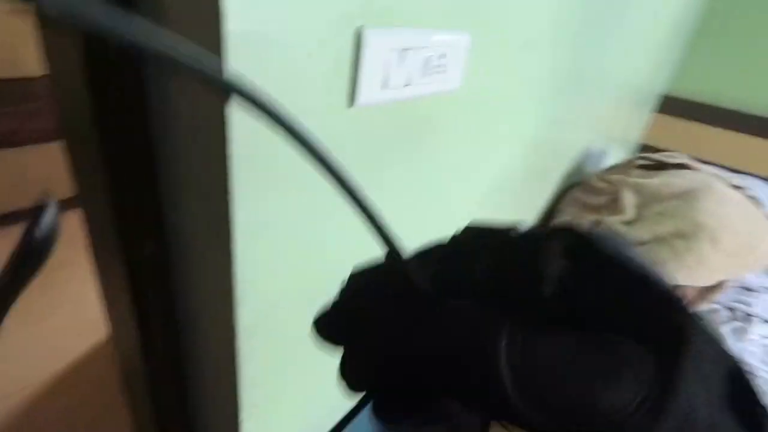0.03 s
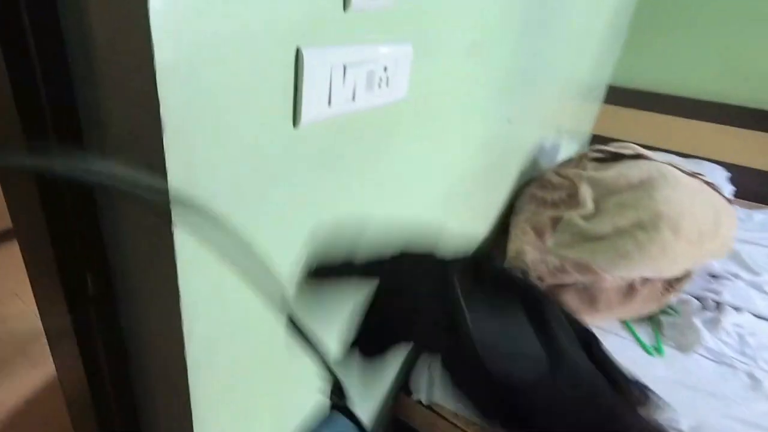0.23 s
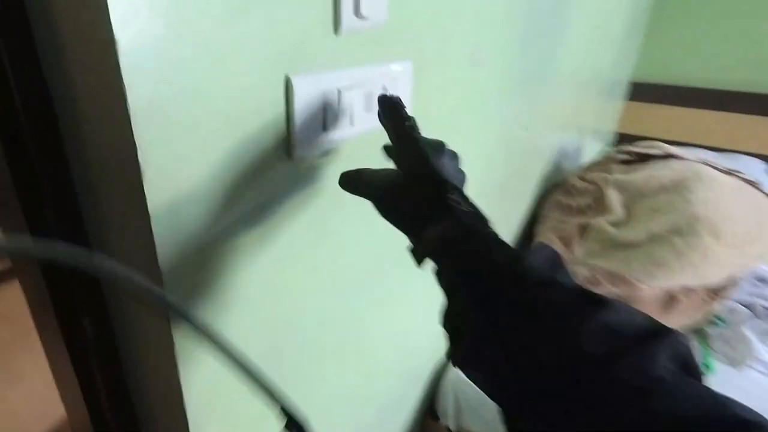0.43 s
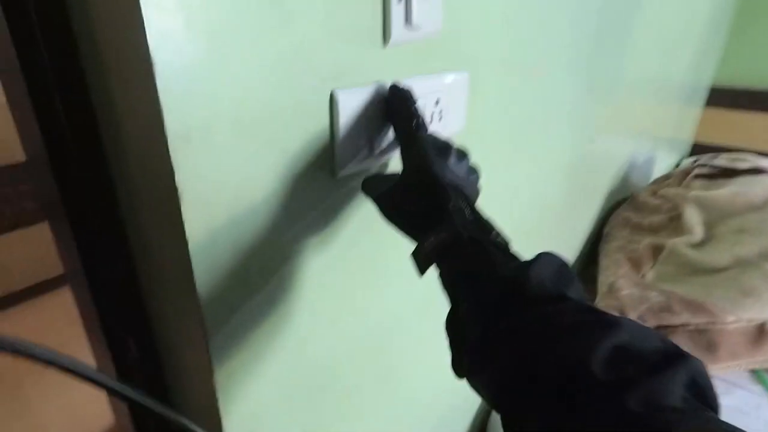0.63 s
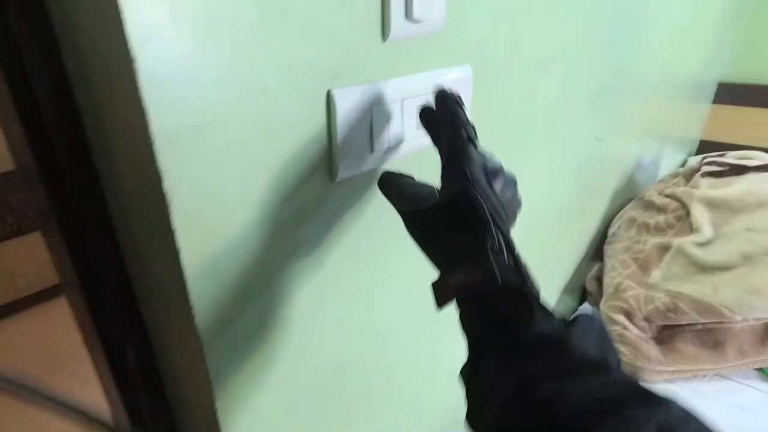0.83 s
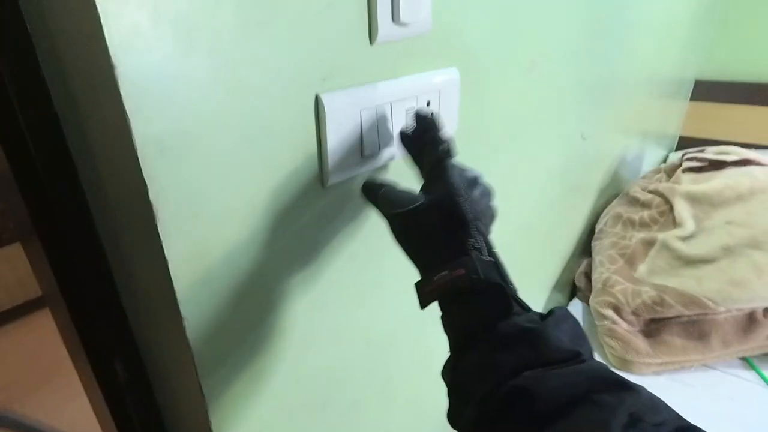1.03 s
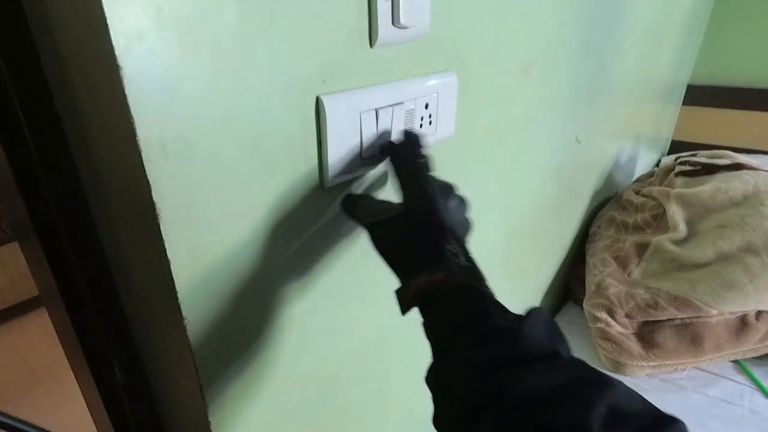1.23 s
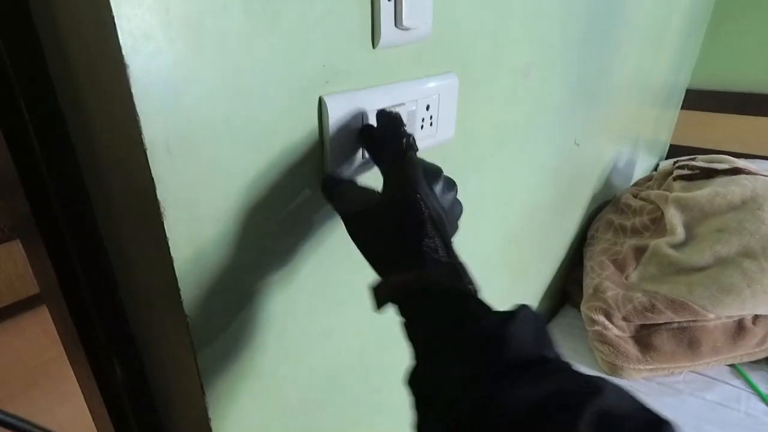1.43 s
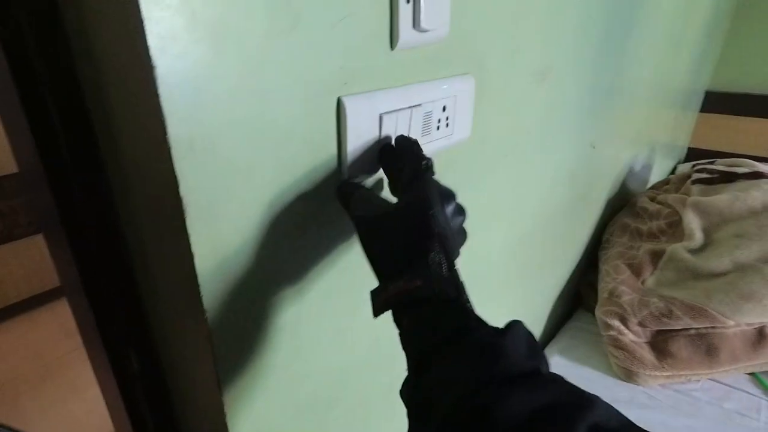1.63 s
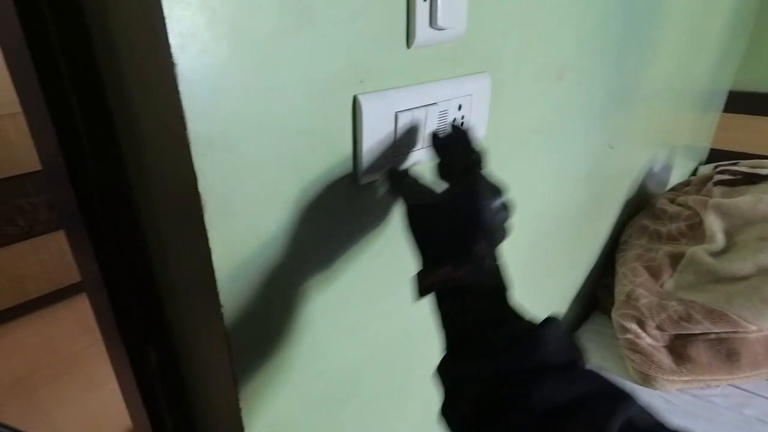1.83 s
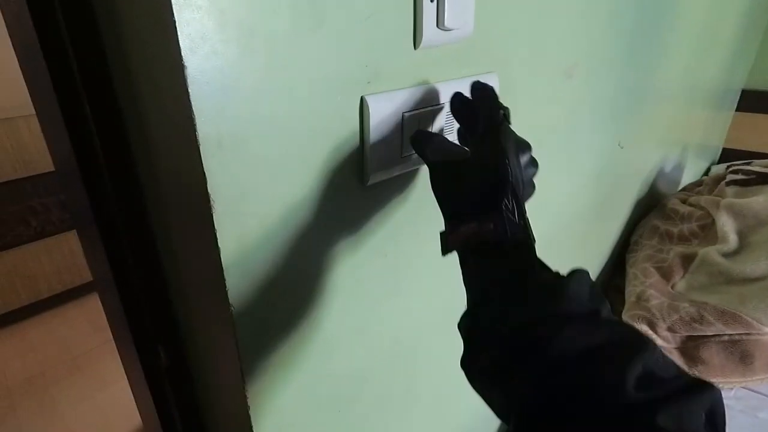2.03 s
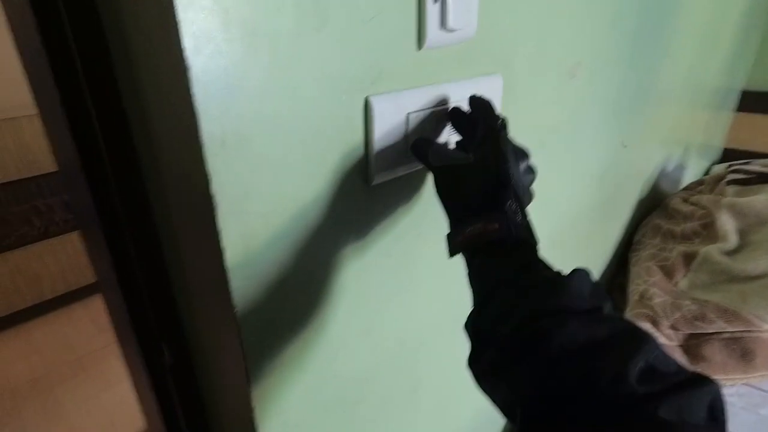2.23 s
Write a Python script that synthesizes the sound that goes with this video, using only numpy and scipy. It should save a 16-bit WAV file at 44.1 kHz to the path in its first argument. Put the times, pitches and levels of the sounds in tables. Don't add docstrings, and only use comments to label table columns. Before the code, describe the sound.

Three sharp plastic wall-switch clicks, spaced half a second apart, in a quiet furnished room

```python
import sys
import numpy as np
from scipy import signal
from scipy.fft import rfft, irfft
from scipy.io import wavfile
from scipy.ndimage import uniform_filter1d

SR = 44100
rng = np.random.default_rng(int(sys.argv[2]) if len(sys.argv) > 2 else 0)


def field_ratio(decibels):
    return 10 ** (np.asarray(decibels, dtype=float) / 20)


def pcm_store(signal):
    levels = np.round(np.clip(np.atleast_2d(signal), -1, 1) * 32767)
    wavfile.write(sys.argv[1], SR, levels.astype(np.int16).T)


N = 100459
LAG_S = 3 / 44100

# hz, left_minus_right_db
PORT_LEAN = [(100, 0.86), (1650, -0.9), (5000, -0.8), (15000, 1.2)]


def evened(x):
    return x / np.sqrt(np.mean(x ** 2) + 1e-20)


def read(points, hz):
    f, value = np.transpose(points)
    return np.interp(np.log(hz + 1), np.log(f + 1), value)


def over_time(points):
    return np.interp(np.arange(N) / SR, *np.transpose(points))


def add(mix, s, sound):
    part = mix[round(s * SR):][:len(sound)]
    part += sound[:len(part)]


def shaped(x, spectrum):
    hz = np.fft.rfftfreq(len(x), 1 / SR)
    return irfft(rfft(x) * field_ratio(read(spectrum, hz)), len(x))


def coloured(x, spectrum):
    return evened(shaped(x, spectrum))


def resonate(x, hz, width):
    r = np.exp(-np.pi * width / SR)
    poles = [2, -4 * r * np.cos(2 * np.pi * hz / SR), 2 * r * r]
    return signal.lfilter([1 - r * r, 0, r * r - 1], poles, x)


def ring(modes, rise_s, scatter_db):
    t = np.arange(8000) / SR
    luck = rng.standard_normal((len(modes), 2))
    out = np.zeros(len(t))
    for (hz, db, t60), (level, phase) in zip(modes, luck):
        decay = field_ratio(db + scatter_db * level - 60 * t / t60)
        out += decay * np.sin(2 * np.pi * hz * t + phase / 3)
    return (1 - np.exp(-t / rise_s)) * out


def ports(x, balance):
    hz = np.fft.rfftfreq(N, 1 / SR)
    half = field_ratio(read(balance, hz) / 2) * np.exp(-1j * np.pi * hz * LAG_S)
    return irfft(rfft(x) * np.array([half, 1 / half]), N)


def switches():
    # start_s, peak_db
    strikes_a = [
        (.7191, -33.5),
        (.7203, -31.5),
        (.7215, -43),
        (.7227, -37),
        (.7245, -36.5),
    ]
    strikes_b = [
        (1.2441, -31.5),
        (1.2450, -33.5),
        (1.2463, -36.5),
        (1.2475, -30),
        (1.2493, -29),
        (1.2510, -35),
        (1.2530, -37),
    ]
    strikes_c = [
        (1.7801, -29.5),
        (1.7814, -31),
        (1.7834, -36),
        (1.7853, -37.5),
        (1.7880, -44),
    ]
    # pitch_hz, level_db, t60_s
    rocker_a = [(870, -32, 0.029), (1118, 3, 0.032), (1480, -3, .012), (2070, -2, 0.0071), (2705, 4, 0.011),
                (2950, 2, 0.015), (3240, -7.5, 0.013), (3540, -26, .01), (4760, -4, 0.027),
                (6350, -20, .01), (14800, -24, 0.0072)]
    rocker_b = [(1195, -27, 0.089), (1480, -16, 0.008), (1970, -17, 0.0074), (2347, -7, 0.016),
                (2800, 4, 0.02), (2840, -17, 0.016), (2980, -1, 0.016), (3680, -4, 0.016),
                (4800, -6, 0.013), (5080, -8, 0.023), (4290, -12, 0.01), (7600, -16, 0.0088),
                (14300, -14, 0.0092)]
    rocker_c = [(819, -13, 0.19), (1240, -3.5, 0.034), (1690, -7.5, 0.05), (2050, -1, 0.016),
                (2550, -1, 0.013), (3150, 6.5, 0.012), (3540, -11, 0.022), (5110, -6.5, 0.016),
                (7600, -17, 0.009), (11370, -21, 0.0092), (15100, -16, 0.0065)]
    # hz, db_per_hz
    crack_colour = [(600, -10), (1000, -10), (2200, 0), (3500, 1.5), (5100, -13.5), (5800, -17),
                    (14500, -22.5), (16300, -39)]
    rise_s, scatter_db = .0002, 1.5
    crack_db, crack_t60_s = 0.5, .012

    cracks, rings = np.zeros(N), np.zeros(N)
    t = np.arange(2000) / SR
    for strikes, modes in ((strikes_a, rocker_a), (strikes_b, rocker_b), (strikes_c, rocker_c)):
        for s, db in strikes:
            add(rings, s, field_ratio(db) * ring(modes, rise_s, scatter_db))
            splinter = coloured(rng.standard_normal(len(t)), crack_colour)
            decay = field_ratio(db + crack_db - 60 * t / crack_t60_s)
            add(cracks, s, decay * np.minimum(t / rise_s, 1) * splinter)
    return cracks, rings


def thrown():
    # start_s, level_db
    snaps = [
        (.721, -14.5),
        (1.248, -10),
        (1.782, -11.5),
    ]
    # hz, level_db
    colour = [(600, -12), (900, 1.5), (1700, -3), (2400, 1.5), (3800, 1.5), (4400, -12), (5300, -2),
              (6400, -28)]
    puffs = np.zeros(N)
    for s, db in snaps:
        puffs[round(s * SR)] = field_ratio(db)
    return shaped(puffs, colour)


def room(x):
    # hz, t60_s
    decay = [(700, 0.58), (1500, 0.44), (3000, 0.32), (6000, 0.32), (12000, 0.053)]
    start_s = .007
    taps = np.zeros((2, 22000))
    at = np.arange(0, 21980, 20) + rng.integers(0, 20, (2, 1099))
    np.put_along_axis(taps, at, rng.choice([-1., 1.], at.shape), 1)
    taps[1] = .8 * np.roll(taps[0], -3) + .6 * taps[1]
    hz, t, z = signal.stft(taps, SR, nperseg=256)
    tail = signal.istft(z * field_ratio(-60 * t / read(decay, hz)[:, None]), SR, nperseg=256)[1]
    tail = np.pad(tail, ((0, 0), (round(start_s * SR), 0)))
    return signal.fftconvolve(x[None], tail / np.linalg.norm(tail[0]), axes=1)[:, :N]


def mount():
    # time_s, effort_db
    motion = [(0.0, -42), (0.23, -54), (0.34, -51), (0.38, -43), (0.46, -51), (0.63, -40), (0.66, -47),
              (0.68, -42), (0.82, -52), (0.85, -47.5), (1.18, -47.5), (1.27, -52.5), (1.32, -49.5),
              (1.37, -60), (1.57, -68), (1.63, -45.5), (1.75, -59), (2.28, -69)]
    # pitch_hz, width_hz, level_db, share_of_effort
    resonances = [(49, 34, -17.5, 0.33), (117.1, 27.4, -9, 1.19), (227, 46.5, -1.5, 1.16),
                  (316, 38, -9, 1.3), (437.7, 72, -10.5, 1.13), (856, 36, -12, 0.33),
                  (1079, 114, -15, 0.37)]
    # start_s, low_db, high_db
    knocks = [
        (0.372, -38, -67),
        (.508, -50, -38),
        (0.597, -24.5, -47),
        (.621, -29, -36.5),
        (.677, -29.5, -78),
        (1.115, -33, -74),
        (1.125, -59, -34.5),
        (1.622, -33.5, -54),
        (1.635, -31.5, -37),
        (1.702, -39, -48.5),
    ]
    # pitch_hz, level_db, t60_s
    knock_low = [(130, 0.5, 0.027), (235.7, -6.5, .09), (305, -8.5, 0.04), (456, -6, 0.025)]
    knock_high = [(640, -6.5, 0.035), (872, 1.5, 0.059), (1102, -5, 0.04), (1384, -8, 0.034)]
    # pitch_hz, level_db, t60_s
    thump = [(49, -44, .45)]
    slips_per_s, slip_spread_db, rest_db = 900, 3, -46.5

    effort_db = over_time(motion) - rest_db
    out = np.zeros(N)
    for hz, width, db, share in resonances:
        size = field_ratio(slip_spread_db * np.minimum(rng.exponential(1, N), 4))
        sign = rng.choice([-1., 1.], N)
        slips = size * sign * (rng.random(N) < slips_per_s / SR)
        shake = resonate(resonate(slips, hz, 1.46 * width), hz, 1.46 * width)
        out += field_ratio(rest_db + db + share * effort_db) * evened(shake)
    for s, low_db, high_db in knocks:
        dull = field_ratio(low_db) * ring(knock_low, .005, 1.5)
        bright = field_ratio(high_db) * ring(knock_high, .002, 1.5)
        add(out, s, dull + bright)
    add(out, .365, ring(thump, 0.011, 2.1))
    side = resonate(rng.standard_normal(N), 300, 400) * uniform_filter1d(abs(out), 600)
    return ports(out, PORT_LEAN) + field_ratio(-20) * np.array([side, -side])


def rustle():
    # time_s, level_db
    settling = [(0, -46.5), (.12, -55), (.3, -56), (.52, -56), (.8, -57.5), (1.2, -61.5), (1.6, -76),
                (2.28, -85)]
    # hz, db_per_hz
    cloth = [(300, -41), (650, 6.5), (1400, -2), (2000, -8.5), (3300, -6.5), (5000, -19.5), (9000, -38)]
    unevenness = evened(uniform_filter1d(rng.standard_normal(N), size=500))
    grain = rng.standard_normal(N) * field_ratio(0.86 * unevenness)
    return field_ratio(over_time(settling)) * coloured(grain, cloth)


def air():
    # hz, db_per_hz
    colour = [(20, -27), (45, -34), (100, -7.5), (300, -6.5), (700, -7), (2000, -15), (6000, -17.5),
              (15300, -22.5)]
    # pitch_hz, width_hz, lift_db
    peaks = [(248, 92, 4.5), (787, 115, 2.5), (3370, 580, 3)]
    # pitch_hz, width_hz, lift_db
    chirr = [(9500, 350, 4), (14100, 400, 5)]
    # hz, likeness
    alike = [(60, .995), (250, 0.59), (700, 0.9), (1650, 1), (4000, 0.44), (8000, 0.22), (15000, 0.1)]
    air_db, hiss_edge_hz = -54.5, 15280
    throb_depth_db, throb_hz = 3.5, 13.5

    frames, hz = N // 256 + 5, np.fft.rfftfreq(1024, 1 / SR)
    a, b, c, d, patches = rng.standard_normal((frames, 513, 5)).T
    patches = uniform_filter1d(patches, size=12, axis=0)
    patches = evened(uniform_filter1d(patches, size=10, axis=1))

    same = np.clip(read(alike, hz), -1, 1)[:, None]
    left = a + 1j * b
    right = same * left + np.sqrt(1 - same ** 2) * (c + 1j * d)
    right = right * (np.exp(2j * np.pi * hz * LAG_S) / field_ratio(read(PORT_LEAN, hz)))[:, None]

    lift_db = sum(db * np.exp(-((hz - f) / w) ** 2) for f, w, db in peaks)
    wander = evened(uniform_filter1d(rng.standard_normal(frames), size=30))
    t = np.arange(frames) * 256 / SR
    throb = np.sin(2 * np.pi * throb_hz * t + 1.2 * wander) + .4 * wander
    throb_db = sum(np.outer(np.exp(-((hz - f) / w) ** 2), db + throb_depth_db * throb) for f, w, db in chirr)

    level_db = (read(colour, hz) + lift_db)[:, None] + 0.67 * patches + throb_db
    z = np.array([left, right]) * field_ratio(level_db) * (hz < hiss_edge_hz)[:, None]
    return field_ratio(air_db) * evened(signal.istft(z, nperseg=1024, noverlap=768)[1][:, :N])


def scene():
    # hz, left_minus_right_db
    snap_balance = [(500, 3), (1500, -2), (3000, -4.5), (5000, -10), (8000, -10.5), (15000, 6)]
    snap_band = signal.butter(4, [700, 16200], "band", fs=SR, output="sos")
    cracks, rings = signal.sosfilt(snap_band, switches())
    echo = room(thrown() + field_ratio(-19.5) * cracks + field_ratio(-16) * rings)
    body_edge = signal.butter(8, 12000, fs=SR, output="sos")
    body = signal.sosfilt(body_edge, mount() + ports(rustle(), PORT_LEAN))
    return ports(cracks + rings, snap_balance) + echo + body + air()


def roll_off(x):
    return signal.sosfilt(signal.butter(12, 16360, fs=SR, output="sos"), x)


def record(dry):
    return roll_off(dry)


dry = scene()
out = record(dry)
pcm_store(out)
```